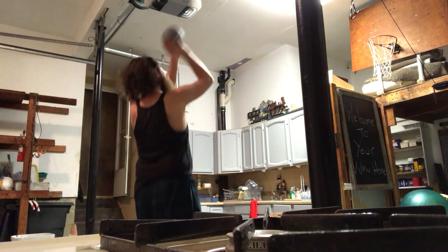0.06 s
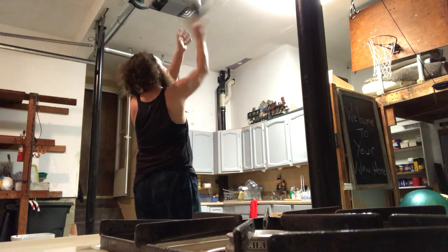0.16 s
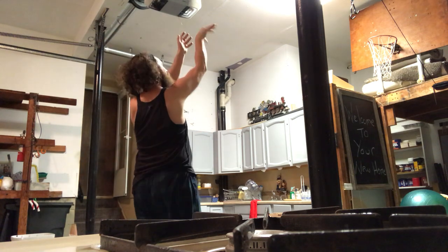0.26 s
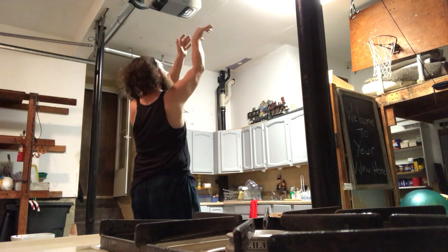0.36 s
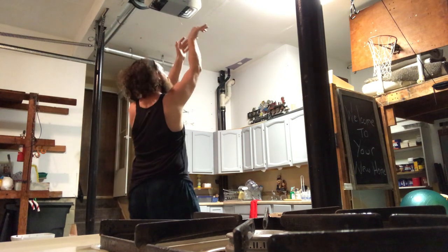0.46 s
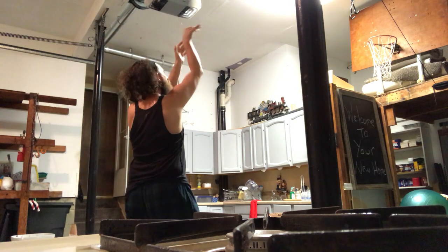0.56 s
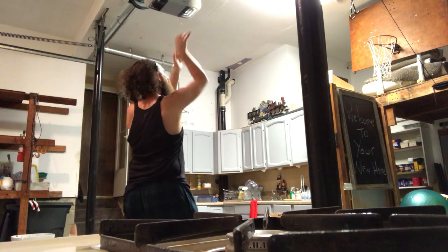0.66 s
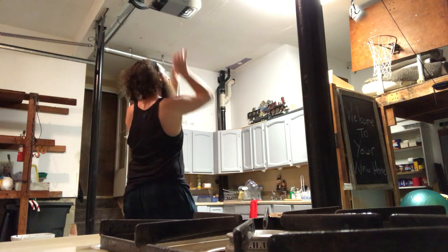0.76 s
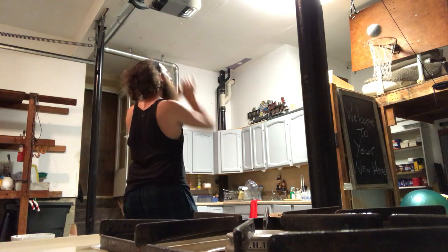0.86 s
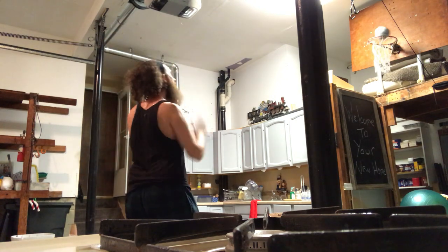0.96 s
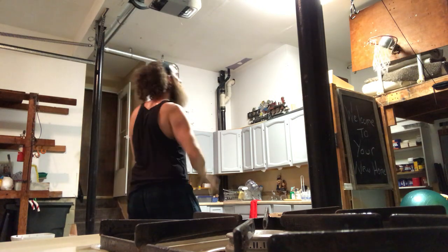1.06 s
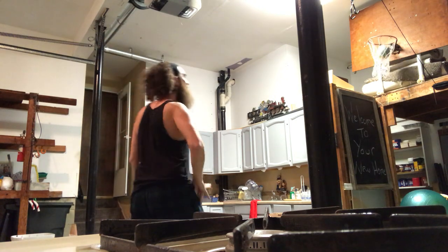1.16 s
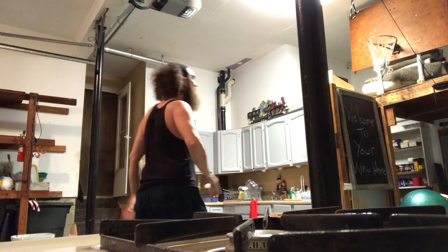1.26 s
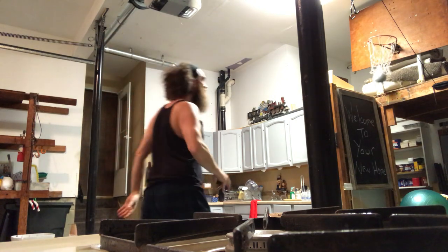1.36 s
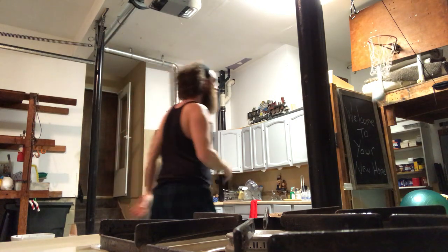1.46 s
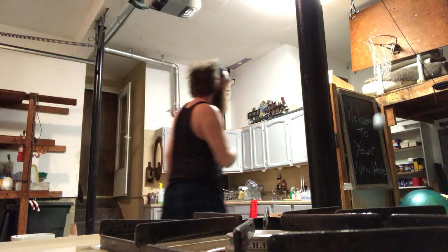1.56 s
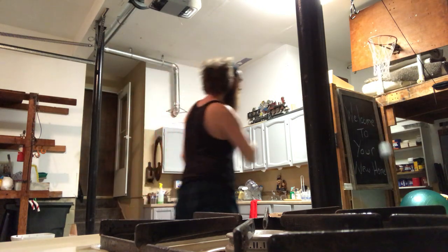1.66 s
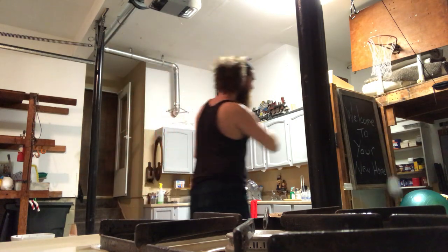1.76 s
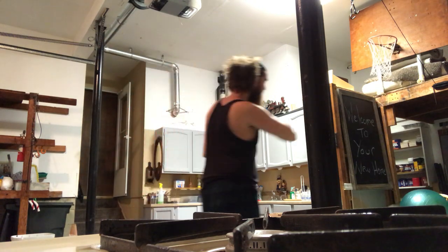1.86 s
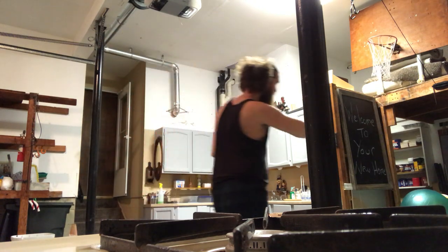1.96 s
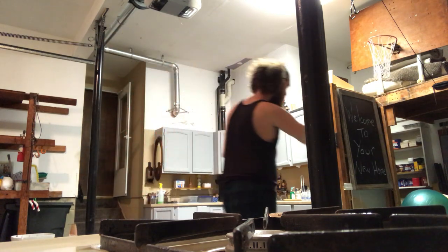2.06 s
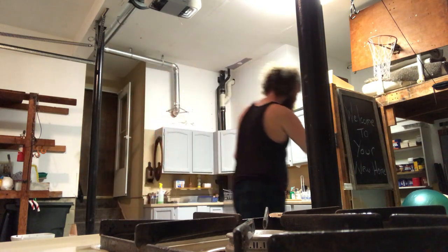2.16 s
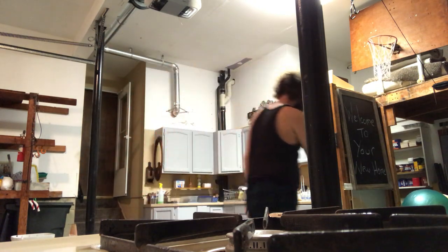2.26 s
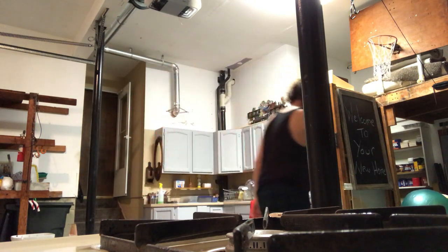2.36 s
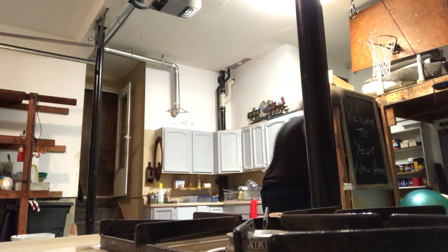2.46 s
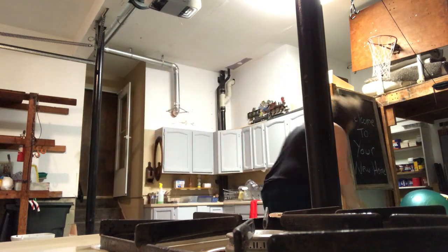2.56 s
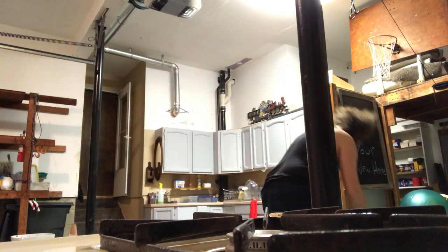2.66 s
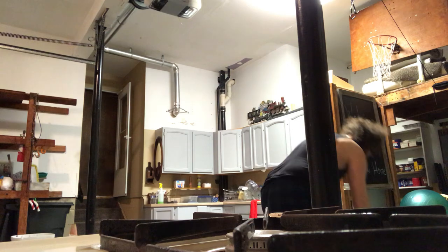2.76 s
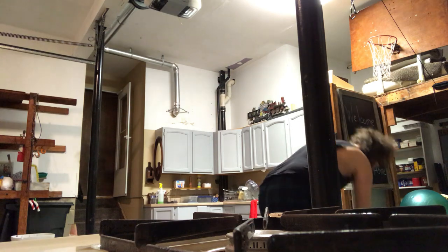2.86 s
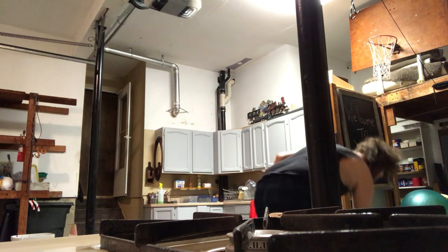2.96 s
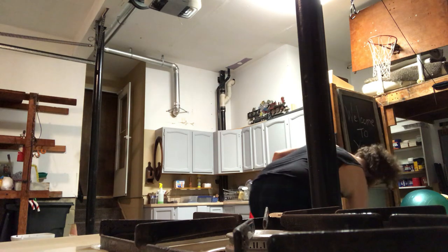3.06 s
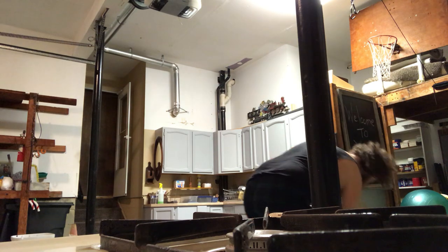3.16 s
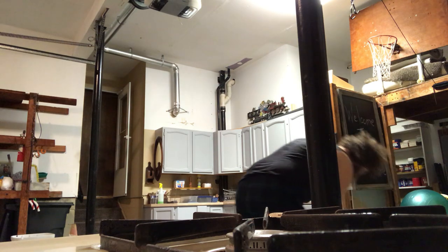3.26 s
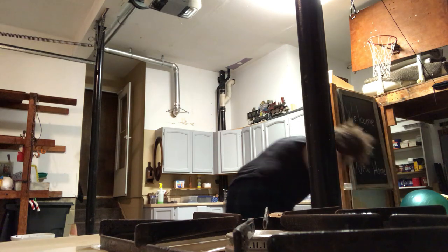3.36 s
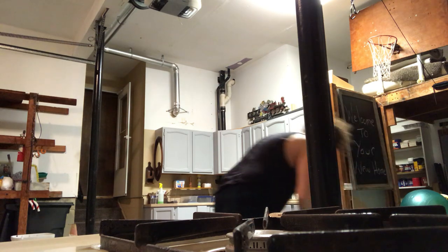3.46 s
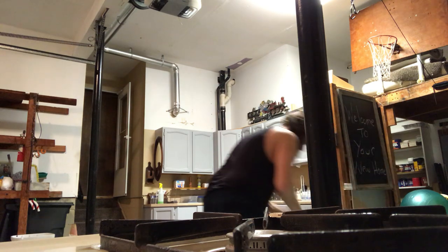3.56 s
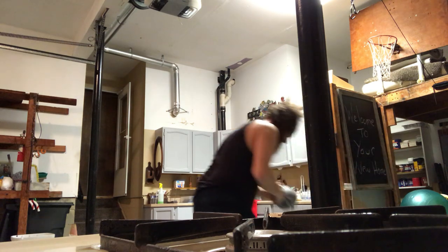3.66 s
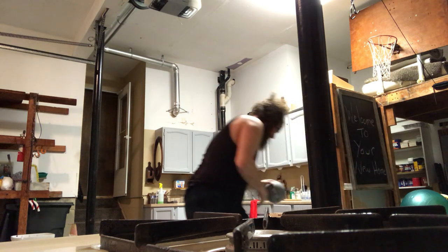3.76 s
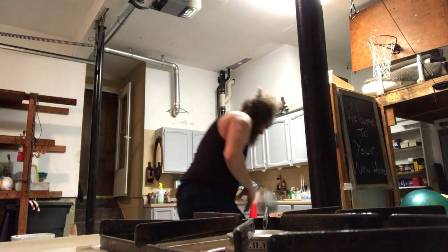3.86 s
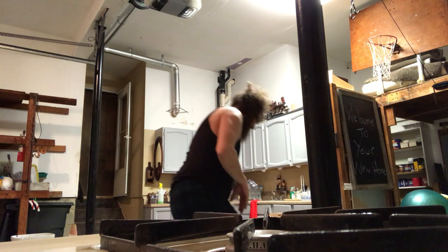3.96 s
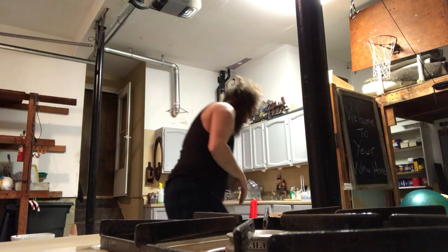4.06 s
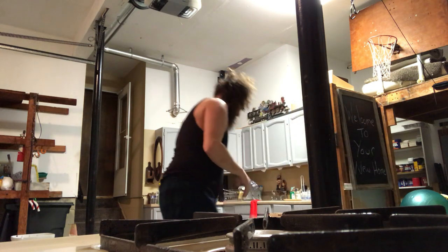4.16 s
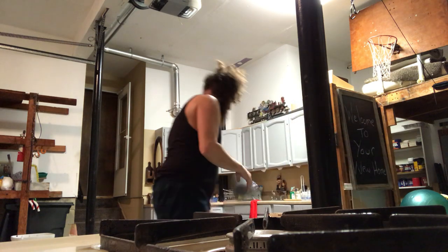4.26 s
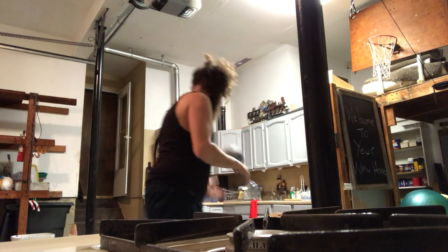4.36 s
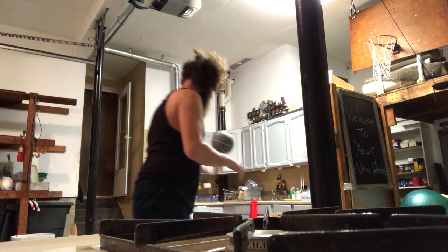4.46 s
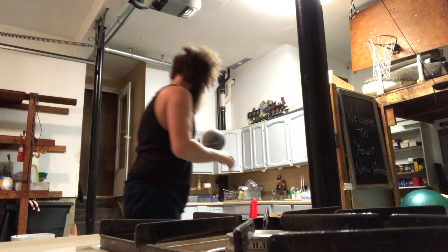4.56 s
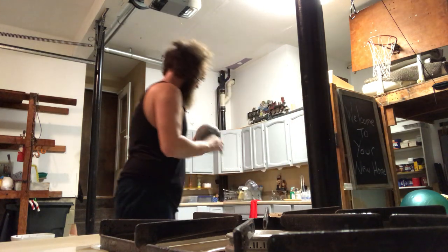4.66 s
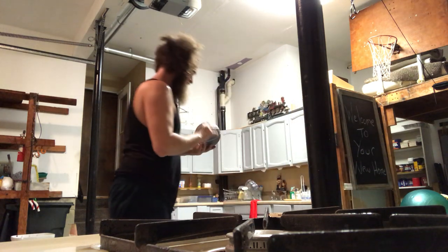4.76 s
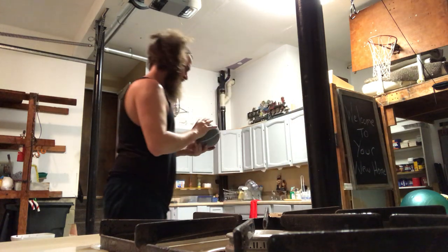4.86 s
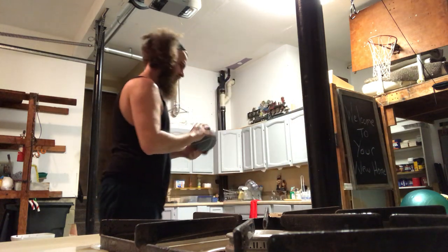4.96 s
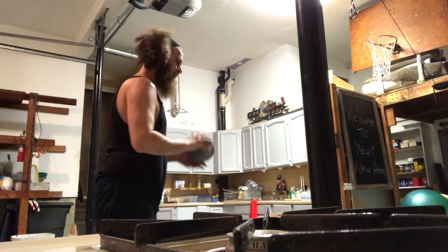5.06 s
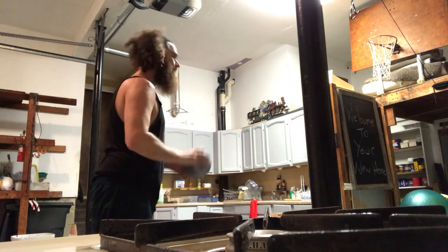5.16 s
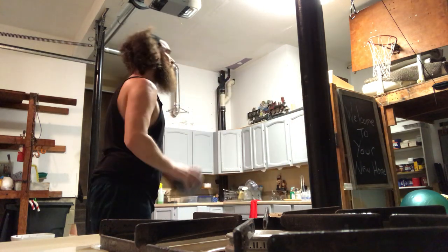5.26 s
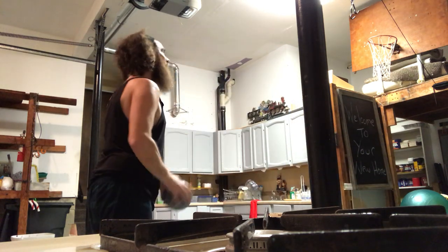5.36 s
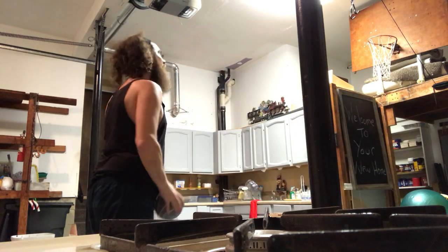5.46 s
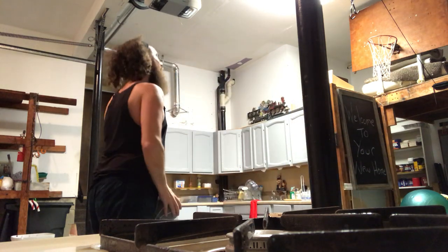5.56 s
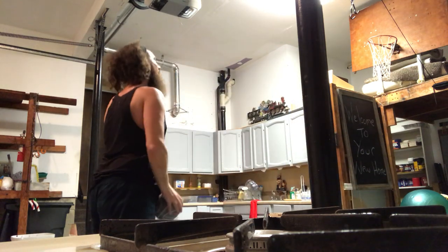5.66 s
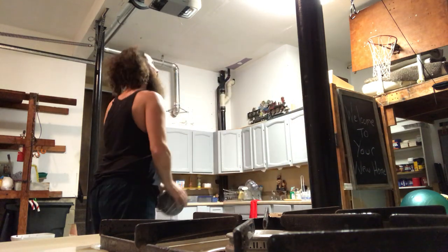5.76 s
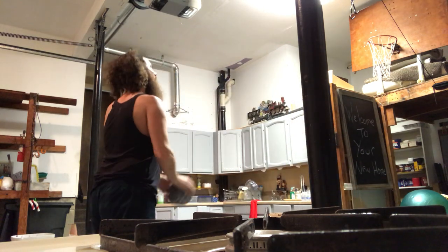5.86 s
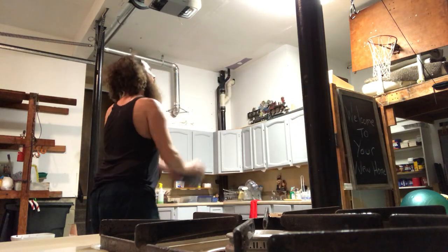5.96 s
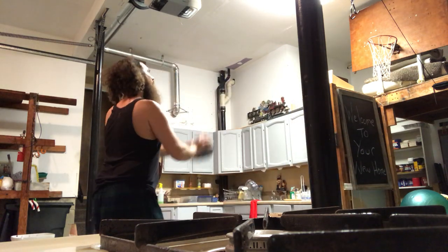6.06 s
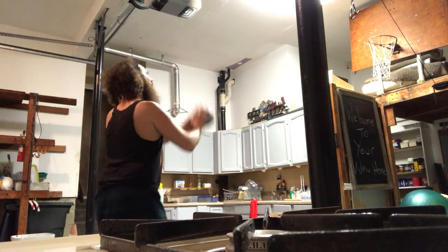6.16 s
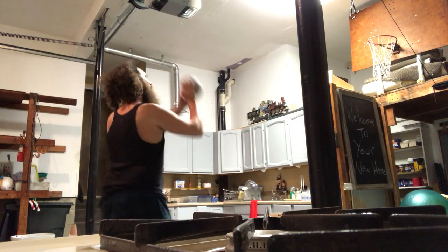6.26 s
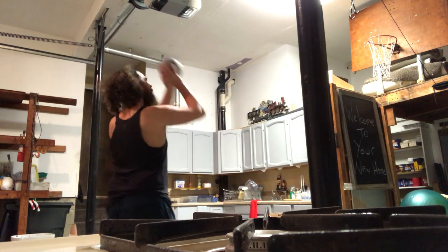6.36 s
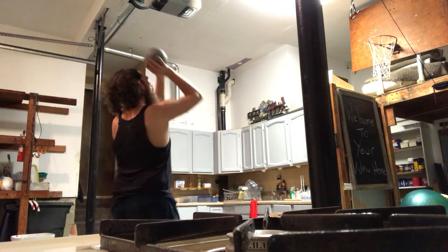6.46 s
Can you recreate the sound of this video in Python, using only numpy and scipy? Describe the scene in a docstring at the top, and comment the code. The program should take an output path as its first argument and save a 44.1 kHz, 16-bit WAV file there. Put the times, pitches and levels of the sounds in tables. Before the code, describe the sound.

In a hard, echoing garage with humming motors, a ball thuds off board and rim, clunks against wood, shoes slap, and the ball bounces crisply.

```python
"""A small basketball bangs into a plywood backboard in a garage, rattles the rim and knocks down past a shelf.
The player steps over, fetches it and bounces it on concrete; shoes slap and scuff, hands brush the ball.
Blows are decaying modes, coloured pulses and noise bursts, each followed by the ring of the hard room.
Motors hum as drifting sines, beating against each other, over filtered noise for air and clothes."""
import sys
import numpy as np
from scipy import signal
from scipy.fft import rfft, irfft, next_fast_len
from scipy.io import wavfile
from scipy.ndimage import uniform_filter1d, map_coordinates

SR = 44100
rng = np.random.default_rng(int(sys.argv[2]) if len(sys.argv) > 2 else 0)


def to_wav(sig):
    """Store sig (one row per channel, or 1-D mono) as 16-bit WAV at the path in sys.argv[1].

    Samples outside -1..1 are clipped; the rate is SR.
    """
    pcm = np.clip(np.atleast_2d(sig), -1, 1) * 32767
    pcm = np.round(pcm).astype(np.int16)
    wavfile.write(sys.argv[1], SR, pcm.T)  # frames by channels


N = 287973
T = np.arange(SR) / SR  # time after a blow, s


def amp(db):
    """Decibels to gain."""
    return 10 ** (np.asarray(db) / 20)


def norm(x):
    """Scale x to energy 1."""
    return x / np.sqrt(np.sum(x ** 2) + 1e-20)


def along(points, hz):
    """Interpolate (f/Hz, value) points on a log-frequency axis."""
    f, v = np.transpose(points)
    return np.interp(np.log(hz + 1), np.log(f), v)


def wobble(knots_per_s):
    """Smooth random curve: a spline through normal random knots."""
    knots = rng.standard_normal(int(N * knots_per_s / SR) + 4)
    return map_coordinates(knots, [np.arange(N) * knots_per_s / SR])


def noise(colour):
    """Steady coloured noise of rms 1."""
    gain = amp(along(colour, np.fft.rfftfreq(N, 1 / SR)))
    shaped = irfft(rfft(rng.standard_normal(N)) * gain, N)
    return norm(shaped) * np.sqrt(N)


def pulse(colour):
    """Minimum-phase pulse of this colour, by folding the cepstrum; energy 1."""
    gain = amp(along(colour, np.fft.rfftfreq(SR, 1 / SR)))
    cepstrum = irfft(np.log(gain), SR)
    fold = 1 + np.sign(SR // 2 - np.arange(SR))
    fold[0] = 1
    return norm(irfft(np.exp(rfft(cepstrum * fold)), SR))


def ring(modes):
    """Sum of decaying modes with random phases, struck at slightly new strengths; energy 1."""
    total = np.zeros(SR)
    for hz, db, t60_s in modes:
        decay = amp(db + rng.normal(0, 2) - 60 * T / t60_s)
        total += decay * np.sin(2 * np.pi * (hz * T + rng.random()))
    return norm(total)


def damped(hz, t60_s, onset_s):
    """One decaying oscillation with a soft start; energy 1."""
    decay = amp(-60 * T / t60_s)
    soft_start = 1 - np.exp(-T / onset_s)
    return norm(np.sin(2 * np.pi * hz * T) * decay * soft_start)


def even(x, bins):
    """Level the broad spectral humps of x, leaving the fine ripple; energy 1."""
    z = rfft(x)
    power = np.abs(uniform_filter1d(np.abs(z) ** 2, bins))
    level = irfft(z / np.sqrt(power + 1e-12), SR)
    return norm(level * (T < .8))  # cut wrapped-round end


def rub(colour_pulse, swell_s, t60_s):
    """Contact made of many tiny ones: a coloured noise burst that swells, then decays; energy 1."""
    swell_s = max(swell_s, 1 / SR)
    force = np.minimum(T / swell_s, 1) * amp(-60 * np.maximum(T - swell_s, 0) / t60_s)
    grains = even(force * rng.standard_normal(SR), bins=500)
    return norm(signal.fftconvolve(grains, colour_pulse)[:SR])


def garage(wet_db, build_s=0.00087, sparse_s=0.011, mean_t60_s=1.0):
    """Direct sound, then single wall echoes thickening into a tail; each frequency dies at its own speed."""
    # room decay: f/Hz, t60/s
    decay_times = [(60, 0.19), (150, 0.55), (500, 0.46), (1500, 0.63), (4000, 0.55), (7000, 0.56),
                   (11000, 0.45), (16000, 0.54)]
    spikiness = np.exp(np.exp(-T / sparse_s) * (rng.standard_normal(SR) - 1))
    echoes = rng.standard_normal(SR) * spikiness
    echoes = even(echoes * (1 - np.exp(-T / build_s)) * amp(-60 * T / mean_t60_s), bins=70)
    hz, t, z = signal.stft(echoes, SR, nperseg=256)
    absorption = amp(-60 * t * (1 / along(decay_times, hz)[:, None] - 1 / mean_t60_s))
    tail = signal.istft(z * absorption, SR, nperseg=256)[1][:SR]
    room = amp(wet_db) * norm(tail)
    room[0] += 1  # direct sound
    return room


def add(track, s, db, sound, wet_db):
    """Sound a blow in the room at time s; db is its energy, room included, spread over 50 ms."""
    heard = norm(signal.fftconvolve(sound, garage(wet_db))[:SR]) * np.sqrt(SR / 20)
    start = max(round(s * SR), 0)
    track[start:start + SR] += amp(db) * heard[:max(N - start, 0)]


def background(drift_rad=0.056, flutter_db=0.5, air_db=-58, cloth_rest_db=-73):
    """Motor orders as drifting sines that beat, over moving air and clothes that stir as the arms move."""
    # motors: shaft f/Hz, level/dB of 1st, 2nd and 4th order before flutter
    motors = [(59, -45, -57.5, -61.5), (57.8, -69.5, -56.5, -65), (48.1, -65.5, -72.5, -66)]
    # clothes stirring: middle t/s, half length/s, level/dB added to the rest level
    rustles = [(.03, 0.19, -67.5), (5.0, 0.73, -75.5), (6.47, 0.094, -68)]
    # moving air: f/Hz, relative level per Hz/dB
    air_colour = [(20, -43.5), (32, -30.5), (47, -5), (70, -19.5), (95, -8), (170, -12.5), (280, -14.5),
                  (500, -24.5), (1270, -33), (2770, -46.5), (3340, -43), (4870, -52.5), (6500, -48.5),
                  (10500, -59), (15500, -54)]
    # cloth: f/Hz, relative level per Hz/dB
    fabric_colour = [(100, -13.5), (420, 2), (850, -15.5), (1200, -4.5), (1700, -8), (3500, -16),
                     (7000, -25.5), (15000, -33.5)]
    t = np.arange(N) / SR
    hum = np.zeros(N)
    for shaft_hz, *levels_db in motors:
        for order, db in zip((1, 2, 4), levels_db):
            hz = order * shaft_hz
            level = amp(db + flutter_db * wobble(4))
            phase_drift = drift_rad * hz / 100 * wobble(4.5)  # drift_rad applies at 100 Hz
            hum += level * np.sin(2 * np.pi * (hz * t + rng.random()) + phase_drift)
    stir = amp(cloth_rest_db)
    for s, half_s, db in rustles:
        stir = stir + amp(db) * np.exp(-((t - s) / half_s) ** 2)
    return hum + amp(air_db) * noise(air_colour) + stir * noise(fabric_colour)


def hoop(board_hz=72, board_t60_s=0.14, chatter_count=8, scatter_s=.003):
    """Plywood flexes and thuds, the loose steel rim clatters and chatters on, the ball scrapes the net."""
    # ball on board and rim: t/s, swell/s, thud, clatter, scrape base level/dB
    contacts = [(0.929, 0.0051, -34.5, -41, -44.5), (.941, 0.0062, -24.5, -34, -38.5),
                (1.003, 0.0054, -42, -40, -44), (1.183, .004, -40.5, -51.5, -60),
                (1.345, 0.0082, -52, -46.5, -67)]
    # plywood modes: f/Hz, relative level/dB, t60/s
    board_modes = [(106, -13, 0.37), (214, -4, 0.32), (327, 2, 0.37), (458, 1, 0.5), (527, -14, 0.4),
                   (790, 2, 0.18)]
    # steel rim modes: f/Hz, relative level/dB, t60/s
    rim_modes = [(1080, 3, .5), (1380, -5, .7), (1430, -18, 0.73), (1700, -5, 0.4), (1900, -25, 0.51),
                 (2455, -1, 0.32), (3020, 12, 0.089), (4060, -17, .42)]
    # board thud: f/Hz, relative level per Hz/dB
    thud_colour = [(20, -9), (45, -2.5), (85, 0.5), (118, -1), (155, -9), (270, -4), (480, -10.5),
                   (820, -13), (2000, -45), (8000, -64)]
    # rim clatter: f/Hz, relative level per Hz/dB
    clatter_colour = [(100, -29), (400, 8), (750, 9), (1800, 9.5), (2700, 0.5), (4000, -3), (7000, -28),
                      (15000, -37)]
    # net scrape: f/Hz, relative level per Hz/dB
    scrape_colour = [(500, -45), (2000, -21), (4300, -2.5), (5200, -6), (6300, -1.5), (8500, -13),
                     (10500, -19.5), (15000, -22.5)]
    # the shaken rim rocks against the board, each contact weaker than the last
    first_s, gap_s, chatter_swell_s = 0.95, 0.05, 0.0075
    chatter = []
    for k in range(chatter_count):
        s = first_s + k * gap_s + rng.normal(0, scatter_s)
        chatter.append((s, chatter_swell_s, -41 - 2.5 * k, -43.5 - k, -50.5 - 4 * k))
    out = np.zeros(N)
    for s, swell_s, thud_db, clatter_db, scrape_db in [*contacts, *chatter]:
        flex = damped(board_hz, board_t60_s, onset_s=0.0028)
        thud = rub(pulse(thud_colour), swell_s, t60_s=0.037) + amp(-9.5) * ring(board_modes)
        clatter = rub(pulse(clatter_colour), swell_s, t60_s=0.096) + amp(-15.5) * ring(rim_modes)
        scrape = rub(pulse(scrape_colour), swell_s, t60_s=0.045)
        add(out, s + swell_s, thud_db - 2.5, flex, wet_db=-1)
        add(out, s, thud_db - 1.0, thud, wet_db=5.5)
        add(out, s, clatter_db, clatter, wet_db=8.0)
        add(out, s, scrape_db, scrape, wet_db=2.0)
    return out


def steps(sheen_hz=(6000, 11000)):
    """Soles slap or drag and hands brush the ball: a friction hiss over the dull knock of the weight behind."""
    # sole slaps, and at 2.0268 s the ball grazing the shelf: t/s, t60/s, friction level/dB, treble sheen/dB
    footfalls = [(1.491, 0.25, -63.5, 3), (1.666, 0.42, -52, 5), (1.863, 0.044, -42.5, 1.5),
                 (2.0268, 0.033, -41, -26), (2.037, 0.017, -45.5, -5), (2.272, 0.19, -37, 1.5),
                 (2.761, 0.5, -64.5, -4)]
    # sole drags and hand brushes: t/s, swell/s, friction level/dB
    scuffs = [(3.05, 0.039, -59), (3.384, 0.044, -47.5), (3.726, 0.021, -58.5), (3.775, 0.046, -51),
              (4.34, 0.031, -57.5), (4.612, 0.021, -63.5), (4.735, .065, -51), (5.9, 0.014, -73.5),
              (6.04, 0.012, -74)]
    # friction before sheen: f/Hz, relative level per Hz/dB
    sole_colour = [(200, -6), (800, 0.5), (1400, 0), (2300, 1), (4200, 3), (5100, -0.5), (6500, 0.5),
                   (8500, -5), (10500, -12.5), (12000, -11.5), (15500, -18.5)]
    # weight knock: f/Hz, relative level per Hz/dB
    heel_colour = [(25, -38.5), (70, -6.5), (150, 3), (300, -7.5), (700, -15), (1300, -18), (4000, -31),
                   (12000, -57.5)]
    # weight levels are relative to friction
    slap_swell_s, slap_weight_db = 0.00058, 1.5
    scuff_t60_s, scuff_sheen_db, scuff_weight_db = .21, 3, -10
    slaps = [(s, slap_swell_s, t60_s, db, slap_weight_db, sheen_db) for s, t60_s, db, sheen_db in footfalls]
    drags = [(s, swell_s, scuff_t60_s, db, scuff_weight_db, scuff_sheen_db) for s, swell_s, db in scuffs]
    out = np.zeros(N)
    for s, swell_s, t60_s, friction_db, weight_db, sheen_db in slaps + drags:
        # sheen tilts the treble, in full above the upper edge
        colour = [(hz, db + np.interp(hz, sheen_hz, (0, sheen_db))) for hz, db in sole_colour]
        add(out, s, friction_db, rub(pulse(colour), swell_s, t60_s), wet_db=1.0)
        add(out, s, friction_db + weight_db, rub(pulse(heel_colour), swell_s, t60_s), wet_db=3)
    return out


def knocks(boom_hz=88, boom_t60_s=0.11, shelf_db=-7):
    """Ball on wood: a low panel boom and a broad resonance ringing the shelf; stored things jostle after."""
    # knocks: t/s, boom base level/dB, knock level/dB, knock f/Hz, upper edge f/Hz
    hits = [(1.677, -46, -34, 670, 1480), (1.795, -43.5, -65, 596, 1490), (1.951, -43.5, -48.5, 238, 505),
            (2.033, -28.5, -32, 426, 1000), (2.274, -46.5, -45.5, 220, 820),
            (2.758, -62.5, -50.5, 595, 2350), (3.098, -52.5, -50, 520, 1580)]
    # shelf modes: f/Hz, relative level/dB, t60/s
    shelf_modes = [(238, 2, 0.24), (331.3, 4.5, 0.35), (393, 0, 0.11), (459.5, 2, 0.32), (587, -2.5, 0.47),
                   (763, -8, 0.23)]
    # panel boom: f/Hz, relative level per Hz/dB
    boom_colour = [(20, -25), (45, -0.5), (87, 12), (130, 6), (200, -0.5), (320, -5.5), (700, -32),
                   (3000, -75)]
    knock_swell_s = .0013
    # jostle levels are relative to the knock level
    jostle_delay_s, jostle_swell_s, jostle_db, jostle_boom_db = .024, .013, -4, -12.5
    jostle_hz, jostle_edge_hz = 380, 790
    blows = [(s, knock_swell_s, *rest) for s, *rest in hits]
    jostles = [(s + jostle_delay_s, jostle_swell_s, db + jostle_boom_db, db + jostle_db,
                jostle_hz, jostle_edge_hz) for s, _, db, *_ in hits]
    out = np.zeros(N)
    for s, swell_s, boom_db, knock_db, hz, edge_hz in blows + jostles:
        wood = pulse([(hz / 10, -26), (hz * .5, -9), (hz, 0), (hz * 1.65, -6),
                      (edge_hz, -10), (edge_hz * 1.79, -25), (edge_hz * 8, -55)])
        shelf = norm(signal.fftconvolve(wood, ring(shelf_modes))[:SR])
        knock = rub(wood, swell_s, t60_s=0.024) + amp(shelf_db) * shelf
        add(out, s, boom_db, damped(boom_hz, boom_t60_s, onset_s=0.0032), wet_db=-1)
        add(out, s, boom_db + 0.5, rub(pulse(boom_colour), swell_s, t60_s=0.022), wet_db=2.5)
        add(out, s, knock_db, knock, wet_db=6)
    return out


def bounces(slap_t60_s=0.018, overtone_ratio=1.68, squash_s=0.0037, thump_hz=116, thump_t60_s=.08):
    """The ball slaps concrete with a short two-toned crack, its skin rings; squashed, it pushes out a thump."""
    # bounces: t/s, slap level/dB, slap f/Hz, overtone re slap/dB, skin level/dB,
    # thump base level/dB, click level/dB
    hits = [(2.838, -47.5, 2750, -4, -50, -39, -41.5), (3.1735, -38.5, 1630, -9, -30, -33.5, -40),
            (4.094, -31.5, 2260, -12.5, -25.5, -22.5, -34)]
    # ball modes: f/Hz, relative level/dB, t60/s
    ball_modes = [(467, -2, 0.41), (636.5, -0.5, 0.27), (677.3, -4, 0.19), (754, -14, 0.15),
                  (1123, 1, 0.099), (1285, 1.5, 0.2), (1426, 3.5, 0.36), (1570, -6.5, 0.21),
                  (1695, 3, 0.17), (2070, 0.5, 0.27), (2100, 2, 0.29), (2195, 0.5, 0.26), (2400, -2, .22)]
    # ball skin: f/Hz, relative level per Hz/dB
    skin_colour = [(150, -24), (700, -16.5), (1050, -8.5), (1550, 1.5), (2000, 0), (2450, -3.5),
                   (2850, -24), (4000, -34), (12000, -49.5)]
    # floor thump: f/Hz, relative level per Hz/dB
    thump_colour = [(20, -49), (60, -27.5), (120, -5), (160, -7), (200, 3.5), (280, -7.5), (470, -14.5),
                    (560, -20.5), (650, -23), (1100, -12), (2500, -42), (8000, -82)]
    # contact click: f/Hz, relative level per Hz/dB
    click_colour = [(200, -11.5), (900, -1.5), (2000, -8), (3000, 0), (4100, -1.5), (5100, -11), (6400, -9),
                    (8500, -17), (10500, -23), (15000, -26.5)]
    out = np.zeros(N)
    for s, slap_db, hz, overtone_db, skin_db, thump_db, click_db in hits:
        overtone = damped(hz * overtone_ratio, slap_t60_s / 2, onset_s=.0004)
        slap = damped(hz, slap_t60_s, onset_s=0.00018) + amp(overtone_db) * overtone
        skin = pulse(skin_colour) + amp(-7.5) * ring(ball_modes)
        thump = damped(thump_hz, thump_t60_s, onset_s=0.0028)
        add(out, s, slap_db, slap, wet_db=-17.5)
        add(out, s, skin_db, skin, wet_db=7.5)
        add(out, s + squash_s, thump_db - 4, thump, wet_db=-8.0)
        add(out, s + squash_s, thump_db - 3.5, pulse(thump_colour), wet_db=7)
        add(out, s, click_db, rub(pulse(click_colour), swell_s=.0004, t60_s=0.023), wet_db=10.5)
    return out


def scene():
    """Mono sum of all sources."""
    return (background() + hoop() + steps() + knocks() + bounces())[None]


def record(dry, low_cut_hz=38, top_hz=15900):
    """Third-order high-pass against the deepest bass, then a brick-wall cut at top_hz."""
    high_pass = signal.butter(3, low_cut_hz, "highpass", fs=SR, output="sos")
    thin = signal.sosfilt(high_pass, dry)
    size = next_fast_len(N + SR // 2)
    passband = np.fft.rfftfreq(size, 1 / SR) < top_hz
    return irfft(rfft(thin, size) * passband, size)[:, :N]


dry = scene()
out = record(dry)
to_wav(out)
```